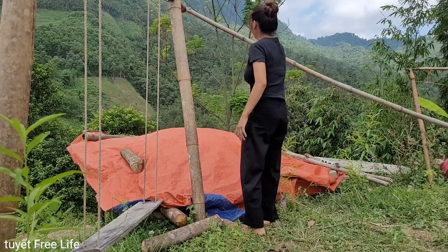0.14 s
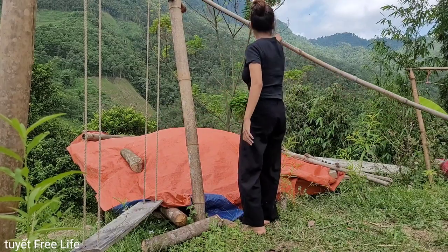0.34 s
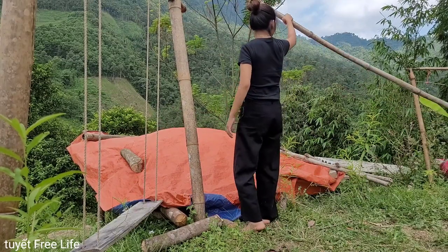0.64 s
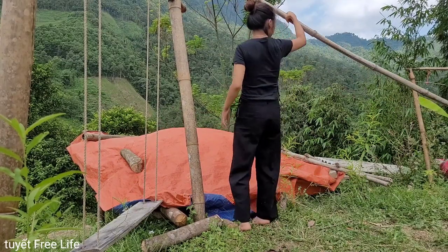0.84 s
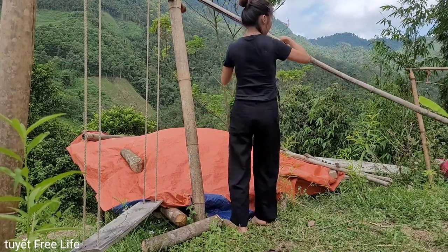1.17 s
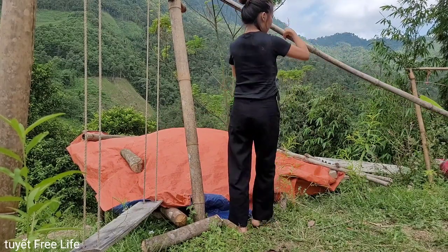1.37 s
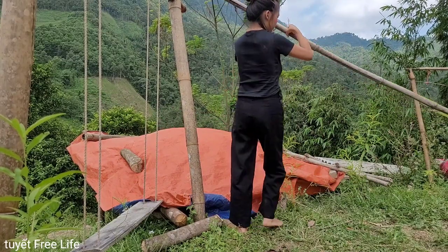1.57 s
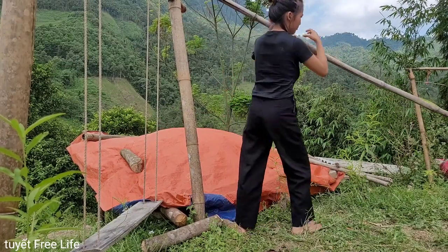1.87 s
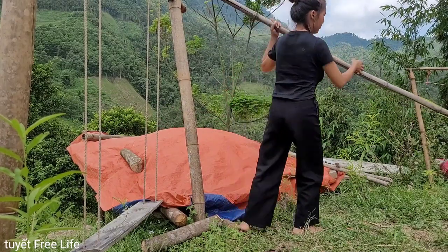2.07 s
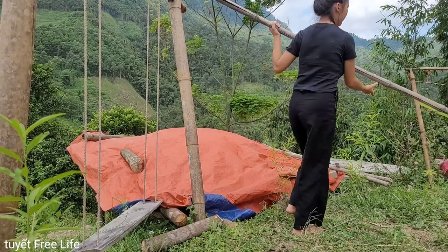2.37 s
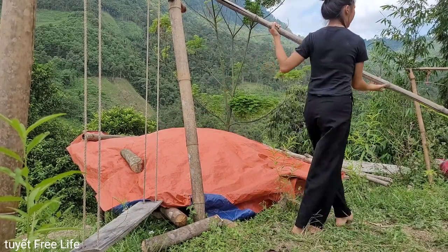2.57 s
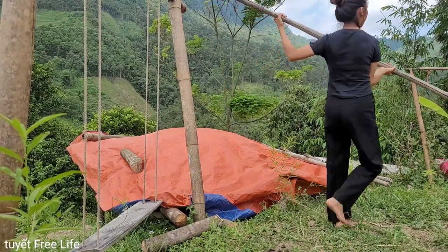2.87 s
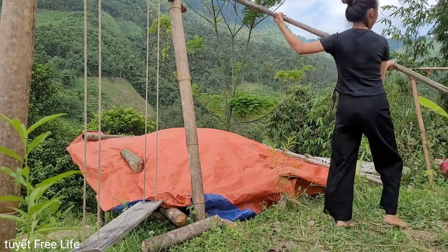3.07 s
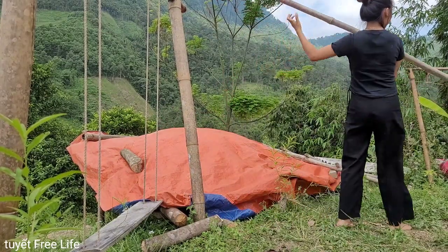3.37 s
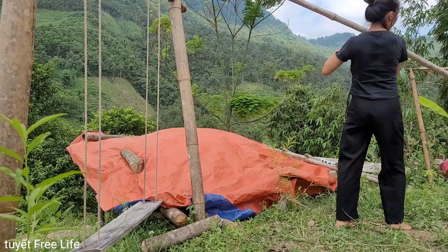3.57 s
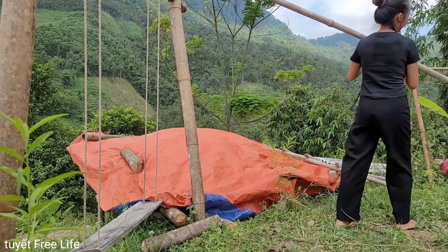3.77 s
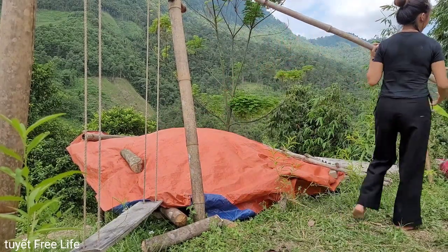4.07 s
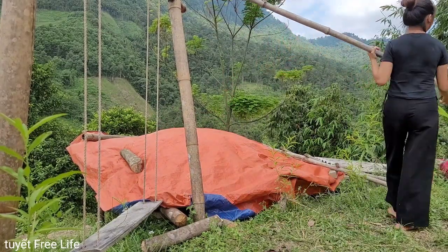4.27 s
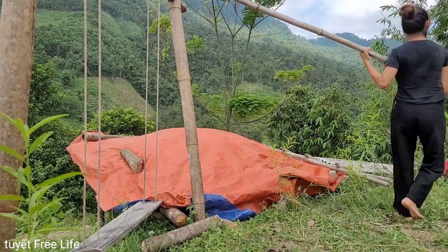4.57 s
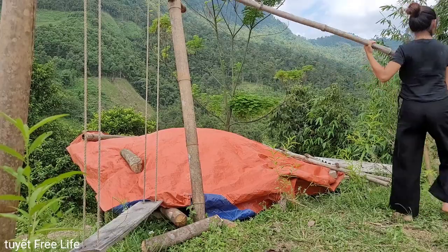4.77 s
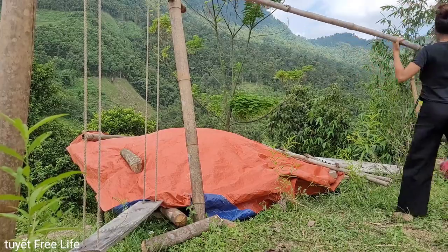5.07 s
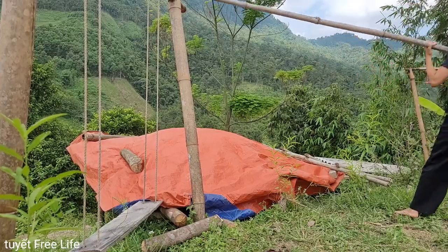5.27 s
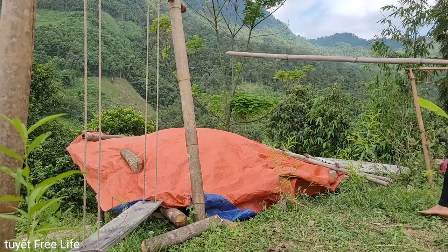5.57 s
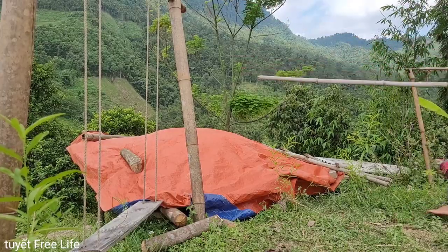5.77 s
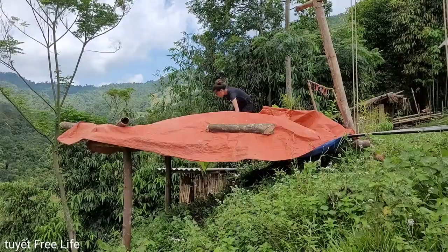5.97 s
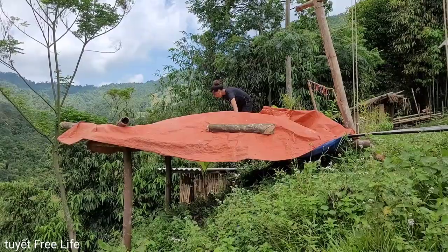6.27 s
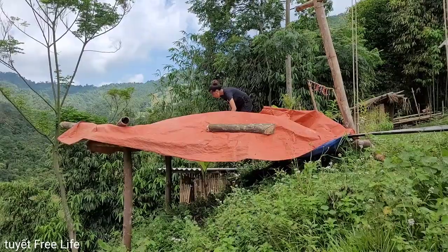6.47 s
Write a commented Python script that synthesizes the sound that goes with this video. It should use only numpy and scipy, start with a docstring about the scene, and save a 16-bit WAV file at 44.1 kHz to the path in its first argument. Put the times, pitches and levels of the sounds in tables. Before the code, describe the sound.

On an open hillside a bamboo pole knocks hard against other poles, a hollow rattling clack early, a weaker tap later, then several strong clacks. Between them come faint scuffs in grass, soft bumps and dry snaps. A nearby cicada drones over hissing insects, a faint engine and low wind buffeting the stereo microphone. Near the end the place changes and the insects grow louder.

```python
"""On a hillside a bamboo pole is dragged off a shelter and knocks against other poles: ringing tube modes, cracks, echoes.
Feet and leaves rustle, bump and snap in shaped noise; one cicada drones close by as a stack of wavering partials.
Behind lie a chorus of patchy hiss, a far engine puttering through resonances, and low wind noise that buffets
the two microphone ports. Near the end the listening place changes: the chorus is louder and the cicada's tone differs."""
import sys
import numpy as np
from scipy import signal
from scipy.fft import rfft, irfft
from scipy.io import wavfile
from scipy.ndimage import uniform_filter1d

SR = 44100
rng = np.random.default_rng(int(sys.argv[2]) if len(sys.argv) > 2 else 0)


def unload_wav(signal):
    """Save mono or channel-first audio to the path in sys.argv[1] as 16-bit WAV at rate SR, clipped to [-1, 1]."""
    wavfile.write(
        sys.argv[1],
        SR,
        np.round(np.clip(np.atleast_2d(signal).T, -1, 1) * 32767).astype(np.int16),
    )


N = 292824
MOVE_S = 6.0  # the listening place changes
# Every level is relative within its layer's mix; pan is left minus right.

# chorus and air, colour at the first and the second place: f/Hz, density/(dB per Hz)
CHORUS_COLOUR = [(88, -45.5), (150, -13), (854, -14), (1190, -3.5), (1290, -14), (1390, -3.5), (2140, -25),
                 (2270, -5), (3350, -10.5), (5250, -7), (7180, -0.5), (8900, -23.5), (12700, -31),
                 (15100, -6.5), (16000, -35)]
CHORUS_COLOUR_LATER = [(88, -30), (150, -11.5), (182, -21), (259, -3.5), (361, -12.5), (2060, -20),
                       (2450, -8.5), (3160, -24), (3920, -12.5), (5360, -12.5), (5910, -6), (7180, -7.5),
                       (9260, -27), (14000, -25), (16000, -37)]
# swell of the chorus: t/s, level/dB
CHORUS_SWELL = [(0.0, -51), (0.5, -53.5), (1.15, -52), (1.57, -55), (2.39, -52.5), (2.9, -46.5),
                (3.85, -51), (4.59, -46.5), (5.34, -45.5), (5.85, -46.5), (6.1, -39.5), (6.64, -41)]

# far engine, boom of its pipe: t/s, f/Hz, level/dB
ENGINE_BOOM = [(0, 66, -60.5), (2, 65.18, -65.5), (3.9, 73.98, -60.5), (4.3, 111.2, -57.5),
               (4.8, 124.6, -55), (5.2, 107.3, -56.5), (5.6, 89.76, -56), (5.95, 123.8, -58),
               (6.05, 125, -74), (6.64, 126.2, -73)]
FIRINGS_PER_S = 20.2  # mean rate

# colour of the wind: f/Hz, density/(dB per Hz)
WIND_COLOUR = [(15, -18), (35, -9.5), (65, 0.5), (110, -16.5), (200, -29), (400, -48.5), (800, -54),
               (3000, -120)]
# breeze at both ports: t/s, level/dB
BREEZE_LEVEL = [(0, -61), (3.1, -72.5), (4.4, -61.5), (6.64, -67)]
# wind striking one port: start t/s, length t/s, level/dB, port (-1 left, 1 right)
WIND_BUFFETS = [(3.32, .06, -43.5, 1), (3.5, 0.074, -37, 1), (3.56, 0.1, -39.5, 1),
                (3.644, 0.058, -39.5, 1), (3.68, .05, -51, -1), (3.725, 0.071, -55, 1),
                (3.805, 0.053, -45, 1), (3.87, 0.044, -45, 1), (3.905, 0.038, -47, -1),
                (3.93, 0.057, -35, 1), (3.98, 0.079, -36, 1), (4.044, 0.057, -24.5, 1),
                (4.115, 0.062, -36, 1), (5.472, 0.084, -33, -1), (5.56, 0.14, -48, -1),
                (5.715, .08, -42, -1), (5.955, 0.077, -44, 1), (6.053, .06, -30, 1),
                (6.115, 0.082, -25.5, 1), (6.195, 0.064, -32, 1), (6.25, 0.051, -26, 1),
                (6.295, 0.059, -42, 1), (6.47, 0.1, -47.5, -1), (6.55, 0.053, -59, 1)]
LEE_DB = -33  # what the sheltered port still gets

# near cicada, rate of its clicks: t/s, rate/(clicks per s)
CICADA_CLICKS = [(0, 256.6), (.3, 255.8), (1.1, 255.6), (2, 256.8), (3.4, 257.3), (4.4, 256.8),
                 (5.5, 254.5), (6.64, 253)]
# loudness of its song: t/s, level/dB
CICADA_LEVEL = [(0, -47), (1.1, -41.5), (1.3, -48.5), (2, -46), (3.4, -41.5), (4.4, -39), (4.7, -42),
                (5.5, -42.5), (5.95, -48.5), (6.03, -39.5), (6.64, -36.5)]
# resonances of its body: f/Hz, width/Hz, level/dB, pan/dB
CICADA_BODY = [(1309, 184, 0.5, -5), (2295, 33, -16, -5), (3727, 270, -11, -4.5), (4062, 57, -5, 0),
               (4366, 490, -9.5, 3), (5350, 730, -6.5, -4.5), (6316, 1000, -10.5, -6),
               (7094, 480, -6, -10.5), (7614, 600, -11.5, 4), (11150, 820, -22, 2),
               (12230, 510, -19.5, 1.5), (12600, 1500, -16, 0)]
# resonances of the cicada nearest to the second place: f/Hz, width/Hz, level/dB, pan/dB
CICADA_BODY_LATER = [(1265, 150, -15, -4), (2630, 400, -8.5, -6), (3890, 330, -7.5, -3),
                     (5060, 110, -10, -3), (5960, 281.4, 0, -4.5), (6580, 550, -8, -12),
                     (7220, 180, 2, -9.5), (13000, 2800, -24.5, -6)]
# a wandering body resonance, first place only: t/s, f/Hz, level/dB
CICADA_RING = [(0, 2666, -6.5), (.7, 2765, -9), (1.6, 2700, -11), (2.4, 2538, -7), (3.5, 2616, -3.5),
               (4.4, 2626, -7), (6, 2548, -3.5)]
RING_WIDTH_HZ, RING_PAN_DB = 180, -5
STEADY, RAGGED, RAGGED_LATER = .07, 0.602, .25  # unevenness of the clicks, 0-1
FALTER_S, FALTER_FOR_S = 4.7, .6  # the song turns ragged as it winds down

# feet in grass and pole on tarp: start t/s, time until the fade t/s, level/dB
RUSTLE_SCUFFS = [(0.263, 0.037, -66), (1.796, .12, -61), (1.935, 0.17, -64), (2.684, 0.18, -49),
                 (2.89, 0.085, -67), (3.09, .035, -51), (3.271, 0.1, -49.5), (3.8, 0.04, -49),
                 (4.606, 0.12, -51), (5.402, .15, -62), (5.869, 0.14, -49.5), (5.981, 0.032, -44.5),
                 (6.42, 0.13, -56)]
# colour of the rustle: f/Hz, density/(dB per Hz)
RUSTLE_COLOUR = [(150, 4.5), (300, 2), (500, -3), (850, 7.5), (1800, 1), (2600, -5), (3500, -9.5),
                 (6000, -4.5), (13000, -29)]
RUSTLE_RISE_S, RUSTLE_FADE_DB_PER_S = 0.024, 252

# soft bumps of feet and hands: t/s, level/dB, pitch f/Hz, t60/s
SOFT_BUMPS = [(0.29, -45, 1370, 0.033), (2.811, -42.5, 860, 0.055), (3.18, -46.5, 343, 0.073),
              (3.193, -49.5, 230, 0.26), (3.202, -44.5, 455, 0.11), (3.815, -47.5, 863, 0.099),
              (4.17, -55, 216, 0.12), (5.339, -51, 237, 0.1), (5.372, -49, 228, 0.13),
              (6.4, -43, 265, 0.12), (6.428, -36, 250, 0.12), (6.471, -36.5, 268, .07),
              (6.512, -39.5, 272, 0.079), (6.556, -44, 298, 0.068)]
# dry leaves and twigs snapping: t/s, level/dB, pitch f/Hz, pan/dB, t60/s
TWIG_SNAPS = [(1.2, -15.5, 7700, -0.5, 0.013), (1.609, -39, 13000, -1.5, 0.0062),
              (2.447, -40.5, 11000, -2, 0.02), (2.6566, -16.5, 8600, 1, 0.0099),
              (2.678, -14.5, 7800, -4, 0.0076), (2.718, -20, 10100, 2, 0.0068),
              (3.198, -36, 11000, 1, 0.044), (4.009, -37, 11000, 1, .008), (4.085, -34, 12000, 1.5, .03),
              (4.458, -43.5, 7000, 5, 0.016), (4.89, -36, 12500, 1, 0.15), (5.18, -35.5, 12500, -5, 0.12),
              (5.5, -33, 12500, 0, 0.094), (6.483, -29, 11500, -3, .01)]

# contacts of the pole: t/s, blow level/dB, hardness (added to the upper modes) level/dB, favoured f/Hz
POLE_KNOCKS = [(1.201, -6, -2.5, 1760), (1.212, -2.5, -29, 401), (1.227, -20, -18.5, 450),
               (1.245, -13, -9, 1750), (1.267, -9.5, -17.5, 1730), (1.299, -26, -28, 352),
               (1.345, -44, -11, 290), (2.436, -17, -9.5, 460), (2.446, -28.5, -14, 180),
               (4.456, -13.5, 1.5, 1310), (4.464, 0, -10.5, 413), (4.475, -13, -38, 404),
               (4.501, -31, -20, 290), (4.839, -14.5, -7, 455), (4.849, -7, -15.5, 440),
               (4.863, -0.5, -26, 420), (4.876, -11.5, -3.5, 1290), (4.912, -42, -19, 290),
               (5.013, -17.5, -14.5, 354), (5.033, -30, -13, 290)]
# modes of the bamboo tube: f/Hz, level/dB, t60/s
TUBE_MODES = [(109, -24.5, 0.15), (175.3, -20.5, 0.12), (221.3, -19.5, .12), (292.7, -15.5, 0.12),
              (348.7, -9, 0.063), (394.7, 1, 0.056), (429.6, -7.5, .05), (456.4, -2, 0.041),
              (506.5, -8.5, 0.028), (686.6, -9.5, .05), (833.6, -2.5, 0.076), (1014, -6, 0.051),
              (1097, 2, 0.043), (1303, 3, 0.031), (1594, 1, 0.032), (1702, 1, 0.031), (1947, -6.5, 0.026),
              (2410, -11, 0.037), (2870, -13, 0.029), (3067, -13.5, 0.032), (4010, -15, 0.018)]
HARD_FROM_HZ = 750  # hardness acts on modes above this
SPOT_DB, SPOT_OCTAVES = 5.5, 0.35  # lift and reach around the favoured pitch
# scatter from ground and trees: f/Hz, t60/s
HILLSIDE_DECAY = [(100, 0.36), (340, 0.17), (1400, 0.15), (3000, 0.22), (6000, 0.023)]

EDGE_HZ = 16600  # upper band limit


def amp(db):
    """Turns decibels into a factor of amplitude."""
    return 10 ** (np.asarray(db) / 20)


def evened(x):
    """Brings x to rms 1."""
    return x / np.sqrt(np.mean(np.abs(x) ** 2) + 1e-20)


def read(points, hz):
    """Reads a curve at hz, straight lines over log frequency."""
    f, value = np.transpose(points)
    return np.interp(np.log(hz + 1), np.log(f + 1), value)


def played(rows):
    """The columns of a time curve at every sample."""
    s, *columns = np.transpose(rows)
    return [np.interp(np.arange(N) / SR, s, c) for c in columns]


def panned(x, pan_db):
    """Splits x to two ports, half the level difference on each."""
    return x * amp(np.array([pan_db, -pan_db]).reshape(2, -1) / 2)


def coloured(x, spectrum):
    """Gives x a spectrum; white input of rms 1 comes out near rms 1."""
    gain = amp(read(spectrum, np.fft.rfftfreq(N, 1 / SR)))
    return irfft(rfft(x) * evened(gain), N)


def drift(rate_hz, channels):
    """Low-passed chance of rms 1."""
    lowpass = signal.butter(2, rate_hz, fs=SR, output="sos")
    x = signal.sosfilt(lowpass, rng.standard_normal((channels, N + SR)))
    return evened(x[:, SR:])  # drops the filter's first second


def resonate(x, hz, width_hz):
    """A movable resonance: shifts the curve hz to zero, smooths, shifts back."""
    turn = np.exp(2j * np.pi * np.cumsum(hz * np.ones(N)) / SR)
    r = np.exp(-np.pi * width_hz / SR)
    return 2 * (turn * signal.lfilter([1 - r], [1, -r], x / turn)).real


def burst(hz, spread, ring, t60, rise_s, channels):
    """A dying puff of noise around a pitch, with a share of pure ring in it."""
    t = np.arange(SR // 5) / SR
    edges = [hz / (1 + spread), min(hz * (1 + spread), .4 * SR)]
    band = signal.butter(2, edges, "band", fs=SR, output="sos")
    puff = signal.sosfilt(band, rng.standard_normal((channels, len(t))))
    body = evened(puff) + ring * np.sin(2 * np.pi * hz * t)
    return body * amp(-60 * t / t60) * np.minimum(t / rise_s, 1)


def chorus():
    """Many far insects and moving leaves melt into a patchy hiss, a little alike at the ports only in the bass."""
    hz, t = np.fft.rfftfreq(512, 1 / SR), np.arange(N // 128 + 5) * 128 / SR
    a, b, c, d, patches = rng.standard_normal((len(t), len(hz), 5)).T
    patches = uniform_filter1d(patches, size=5, axis=0)
    patches = evened(uniform_filter1d(patches, size=20, axis=1))
    same = 0.27 / (1 + (hz[:, None] / 450) ** 2)
    left = a + 1j * b
    right = same * left + np.sqrt(1 - same ** 2) * (c + 1j * d)
    early = evened(amp(read(CHORUS_COLOUR, hz)))[:, None]
    late = evened(amp(read(CHORUS_COLOUR_LATER, hz)))[:, None]
    colour = np.where(t < MOVE_S, early, late)
    lean = panned(1, -3.0 * np.exp(-((hz - 7500) / 3000) ** 2))[:, :, None]  # to the right around 7.5 kHz
    z = np.array([left, right]) * colour * amp(2.0 * patches) * lean
    hiss = signal.istft(z, nperseg=512, noverlap=384)[1][:, :N]
    return amp(played(CHORUS_SWELL)[0]) * evened(hiss)


def engine():
    """One puff a firing booms in the pipe and, more weakly, in a fixed higher band."""
    boom_hz, level_db = played(ENGINE_BOOM)
    rate = FIRINGS_PER_S * (1 + 0.066 * drift(13.0, channels=1)[0])
    fired = np.diff(np.floor(np.cumsum(rate) / SR), prepend=0)
    puffs = evened(fired * amp(2.0 * rng.standard_normal(N))) + 0.28 * rng.standard_normal(N)
    boom = evened(resonate(resonate(puffs, boom_hz, 50), boom_hz, 70))
    breath = puffs + 4.8 * rng.standard_normal(N)
    upper = evened(resonate(resonate(breath, 290, 73), 170, 130))
    return amp(level_db) * (boom + amp(-4) * upper)


def wind():
    """Lumpy low noise, unrelated at the two ports: a breeze, and buffets that swell and sink at one port."""
    lumps = coloured(rng.standard_normal((2, N)), WIND_COLOUR) * amp(2.0 * drift(15, channels=2))
    out = amp(played(BREEZE_LEVEL)[0]) * lumps
    for s, length, db, port in WIND_BUFFETS:
        part = slice(round(s * SR), round((s + length) * SR))
        arch = np.hanning(len(out[0, part])) ** 0.62
        reach = amp([[LEE_DB], [0]] if port > 0 else [[0], [LEE_DB]])
        # ports swapped, so a buffet does not repeat the breeze
        out[:, part] += amp(db) * reach * [evened(arch * lump) for lump in lumps[::-1, part]]
    return out


def partial_size(body, hz):
    """Level at each port of a partial, from the resonances of a body."""
    f, width, db, pan_db = np.transpose(body)
    share = amp(db) / (1 + (2 * (hz - f) / width) ** 2)
    return panned(share.sum(), share @ pan_db / share.sum())


def cicada():
    """Clicks make a stack of partials; moving leaves make them fade, neighbours partly together, at each port."""
    rate, level_db, t = *played(CICADA_CLICKS), *played(CICADA_LEVEL), np.arange(N) / SR
    falter = np.clip((t - FALTER_S) / FALTER_FOR_S, 0, 1)
    uneven = np.where(t > MOVE_S, RAGGED_LATER, STEADY + (RAGGED - STEADY) * falter)
    wobble = .0003 * drift(2.2, channels=1)[0] + .02 * uneven * drift(60, channels=1)[0]
    turn = np.exp(2j * np.pi * np.cumsum(rate * (1 + wobble)) / SR).astype(np.complex64)
    hop, frames = 512, N // 512 + 2  # fading is drawn once a hop, then blended
    blend, when = np.arange(hop, dtype=np.float32) / hop, np.arange(frames) * hop / SR
    s, ring_hz, ring_db = np.transpose(CICADA_RING)
    ring_hz, ring_db = np.interp(when, s, ring_hz), np.interp(when, s, ring_db)
    partial, phase, fading, out = turn ** 3, 1, 0, np.zeros((2, N))
    for order in range(4, 61):
        partial = partial * turn
        a, b = rng.standard_normal((2, 2, frames + 8))
        fresh = uniform_filter1d(uniform_filter1d(a + 1j * b, size=3), size=3)
        fresh = evened(fresh)[:, :frames]
        step = np.exp(1.7j * rng.standard_normal())  # random phase step from partial to partial
        phase = phase * step
        fading = evened(0.35 * step * fading + fresh)
        port_turn = np.exp(.65j * rng.choice([-1, 1]) * np.array([[1], [-1]]))
        gain = phase * port_turn + min(0.87 * order / 20, 1.1) * fading  # upper partials waver more
        ring = amp(ring_db) / (1 + (2 * (order * rate[0] - ring_hz) / RING_WIDTH_HZ) ** 2)
        early = partial_size(CICADA_BODY, order * rate[0]) + panned(ring, RING_PAN_DB)
        late = partial_size(CICADA_BODY_LATER, order * rate[-1])
        gain = (gain * np.where(when > MOVE_S, late, early)).astype(np.complex64)
        smooth = gain[:, :-1, None] + np.diff(gain)[:, :, None] * blend
        out += (smooth.reshape(2, -1)[:, :N] * partial).real
    throb = amp(1.2 * drift(40, channels=1))  # the whole song flutters a little
    return amp(level_db) * evened(out) * throb


def rustle():
    """Noise in clumps of uneven loudness, partly shared by the ports; each scuff rises, holds and fades."""
    level, t = np.zeros(N), np.arange(N) / SR
    for s, length, db in RUSTLE_SCUFFS:
        rise = np.clip((t - s) / RUSTLE_RISE_S, 0, 1)
        level += rise * amp(db - RUSTLE_FADE_DB_PER_S * np.maximum(t - s - length, 0))
    grains = rng.standard_normal((3, N)) * amp(2.5 * drift(96, channels=1))
    return coloured(evened(grains[:1] + 1.35 * grains[1:]), RUSTLE_COLOUR) * level


def bumps():
    """Soft thumps: a quickly dying tone with narrow noise around it, the same at both ports."""
    out = np.zeros(N + SR)
    for s, db, hz, t60 in SOFT_BUMPS:
        thump = burst(hz, 0.23, 2.2, t60, 0.0072, channels=1)[0]
        out[round(s * SR):][:SR // 5] += amp(db) * thump
    return out[:N]


def snaps():
    """Bright cracks of wide noise with a little ring, the noise unlike at the two ports."""
    out = np.zeros((2, N + SR))
    for s, db, hz, pan_db, t60 in TWIG_SNAPS:
        crack = amp(db) * burst(hz, .8, .2, t60, t60 / 5, channels=2)
        out[:, round(s * SR):][:, :SR // 5] += panned(crack, pan_db)
    return out[:, :N]


def hillside(x):
    """Sparse echoes of random sign, each band dying at its own speed; alike at both ports only in the bass."""
    taps = rng.choice([-1., 1.], (3, SR // 2)) * (rng.random((3, SR // 2)) < 2000 / SR)
    hz, t, z = signal.stft(taps, SR, nperseg=256)
    same = 1 / (1 + (hz[:, None] / 900) ** 2)
    z = same * z[:1] + np.sqrt(1 - same ** 2) * z[1:]
    z = z * amp(-60 * t / read(HILLSIDE_DECAY, hz)[:, None])
    tail = signal.istft(z, SR, nperseg=256)[1]
    return signal.fftconvolve(x, tail / np.linalg.norm(tail[0]), axes=1)[:, :N]


def knocks():
    """Each contact cracks and rings the tube; a harder one wakes the upper modes, the spot struck shifts the balance."""
    out, t = np.zeros((2, N + SR)), np.arange(SR // 4) / SR
    hz, db, t60 = np.transpose(TUBE_MODES)[:, :, None]
    chances = rng.standard_normal((len(POLE_KNOCKS), len(TUBE_MODES), 3))
    rise = np.minimum(t / (0.0022 + 1.34 / hz), 1) ** 2  # bass takes longer to build
    splinter = signal.butter(1, [2000, 3800], "band", fs=SR, output="sos")
    for (s, blow_db, hard_db, spot_hz), chance in zip(POLE_KNOCKS, chances):
        size_db = blow_db + db + hard_db * (hz > HARD_FROM_HZ) + 0.5 * chance[:, :1]
        size_db = size_db + SPOT_DB * np.exp(-(np.log2(hz / spot_hz) / SPOT_OCTAVES) ** 2)
        phase = 2 * np.pi * hz * (1 + 0.0086 * chance[:, 1:2]) * t
        lag = 0.4 + 0.43 * hz / 1000 * chance[:, 2:]  # the ports hear a long pole unlike in the treble
        envelope = amp(size_db - 60 * t / t60) * rise
        rings = np.array([(envelope * np.sin(phase - side * lag)).sum(0) for side in (0, 1)])
        crack = signal.sosfilt(splinter, rng.standard_normal((2, len(t)))) * np.minimum(t / 0.0057, 1)
        crack = amp(blow_db + hard_db - 1.5 - 60 * t / 0.053) * crack
        out[:, round(s * SR):][:, :len(t)] += rings + crack
    return out[:, :N]


def scene():
    """Mixes the knocks and their echoes with all the other layers."""
    pole = knocks()
    struck = panned(pole, -2.0) + amp(-7) * hillside(pole)
    return struck + bumps() + snaps() + rustle() + cicada() + chorus() + engine() + wind()


def record(dry):
    """Clips whatever passes full scale, then limits the band."""
    held = np.clip(dry, -1, 1)
    lowpass = signal.firwin(511, EDGE_HZ, window=("kaiser", 9), fs=SR)
    return signal.oaconvolve(held, lowpass[None], "same")


dry = scene()
out = record(dry)
unload_wav(out)
```